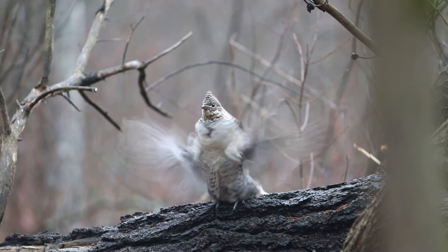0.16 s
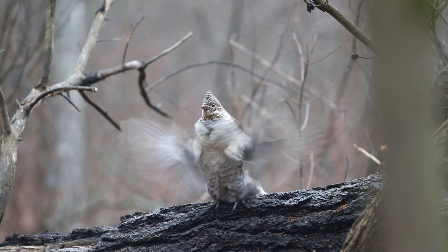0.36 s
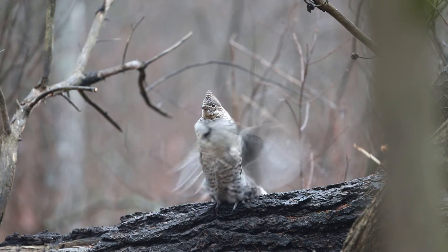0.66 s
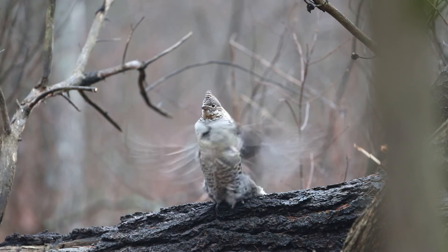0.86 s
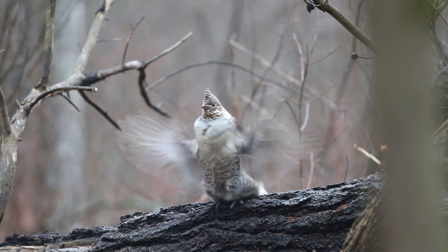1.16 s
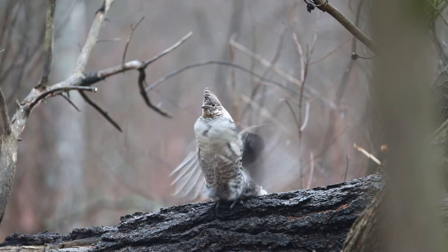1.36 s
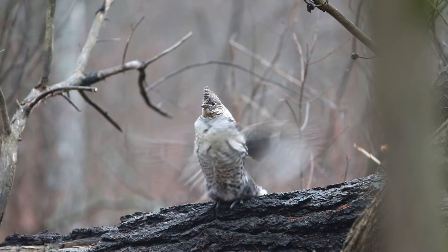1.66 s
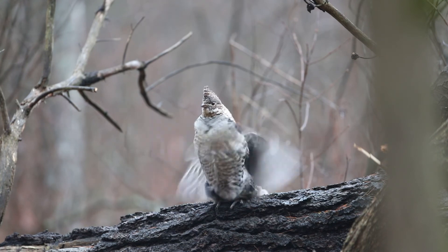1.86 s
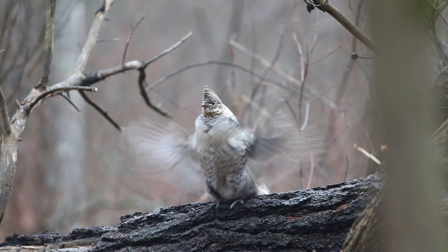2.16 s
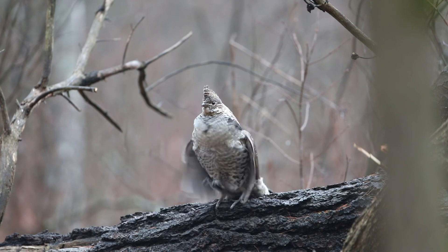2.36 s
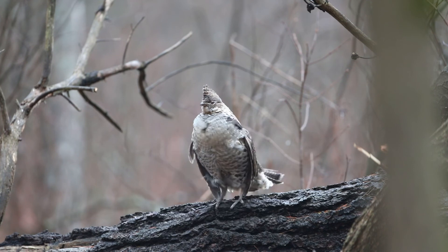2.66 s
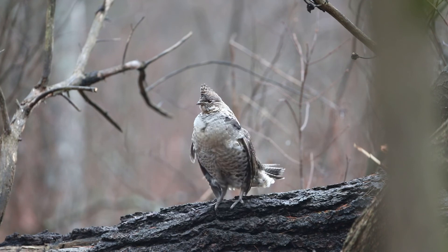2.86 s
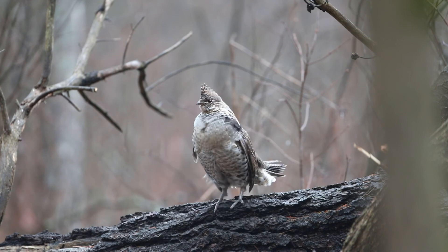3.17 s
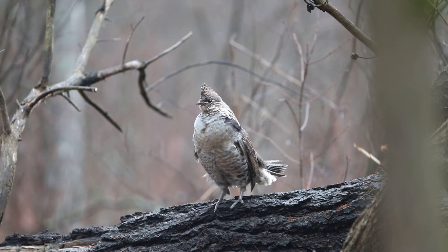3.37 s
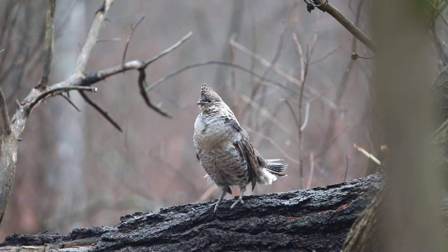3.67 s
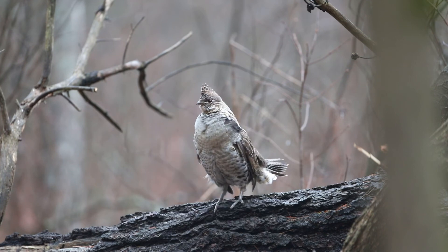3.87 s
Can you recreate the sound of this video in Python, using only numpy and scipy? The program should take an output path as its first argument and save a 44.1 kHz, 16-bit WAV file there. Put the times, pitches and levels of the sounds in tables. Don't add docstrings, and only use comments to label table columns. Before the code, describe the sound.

Wing drumming of a grouse: deep soft thumps speed up, slow down and stop in quiet woods.

```python
import sys
import numpy as np
from scipy import signal
from scipy.fft import rfft, irfft
from scipy.io import wavfile
from scipy.ndimage import uniform_filter1d

SR = 44100
rng = np.random.default_rng(int(sys.argv[2]) if len(sys.argv) > 2 else 0)


def boost(x):
    u = np.asarray(x, float) / 20
    return 10 ** u


def inscribe(sig):
    pcm = np.round(np.clip(np.atleast_2d(sig).T, -1, 1) * 32767)
    wavfile.write(sys.argv[1], SR, pcm.astype(np.int16))


N = 176400
EARLY_S = 0.1
EARLY = SR // 10


def evened(x):
    return x / np.sqrt(np.mean(x ** 2) + 1e-20)


def read(points, hz):
    f, value = np.transpose(points)
    return np.interp(np.log(hz + 1), np.log(f + 1), value)


def add(layer, start_s, sound):
    part = layer[..., round((start_s + EARLY_S) * SR):][..., :sound.shape[-1]]
    part += sound[..., :part.shape[-1]]


def coloured(points, size):
    gain = boost(read(points, np.fft.rfftfreq(size, 1 / SR)))
    return evened(irfft(rfft(rng.standard_normal(size)) * gain, size))


def resonate(x, hz, width_hz):
    b, a = signal.iirpeak(hz, hz / width_hz, SR)
    return signal.lfilter(b, a, signal.lfilter(b, a, x))


def hann(t, lead_s, trail_s):
    return np.cos(np.pi / 2 * np.clip(np.where(t < 0, t / lead_s, t / trail_s), -1, 1)) ** 2


def bell(t, at_s, spread_s):
    return np.exp(-((t - at_s) / spread_s) ** 2 / 2)


def wavelet(t, hz, at_s, half_s, lag_s=0):
    return np.cos(2 * np.pi * hz * (t - at_s)) * hann(t - at_s - lag_s, half_s, half_s)


def tilted(x, left_db):
    return x * boost([[left_db / 2], [-left_db / 2]])


def wash():
    # hz, level_db (per Hz)
    wash_spectrum = [(20, -22), (50, 1.5), (110, -7.5), (250, -10), (1300, -15.5), (4300, -20.5),
                     (9000, -27), (15500, -38)]
    # hz, left-right likeness (0-1)
    ear_likeness = [(30, 1), (120, 0.64), (300, 0.15), (700, 0.28), (2000, 0.04), (9000, 0.042)]
    level_db, left_db, rumble_cut_hz = -54.5, 1.37, 34
    count, hz = N // 256 + 5, np.fft.rfftfreq(1024, 1 / SR)
    re_1, im_1, re_2, im_2, patches = rng.standard_normal((count, 513, 5)).T
    patches = evened(uniform_filter1d(uniform_filter1d(patches, 12, 0), 10, 1))
    flicker, gust = evened(uniform_filter1d(rng.standard_normal((2, count)), 4, 1))
    same = np.clip(read(ear_likeness, hz), -1, 1)[:, None]
    left = re_1 + 1j * im_1
    right = same * left + np.sqrt(1 - same ** 2) * (re_2 + 1j * im_2)
    lumps_db = read([(60, 3.7), (250, 0.22)], hz)[:, None] * gust
    gain = boost(read(wash_spectrum, hz)[:, None] + 0.3 * patches + 0.35 * flicker + lumps_db)
    air = signal.istft(np.array([left, right]) * gain, nperseg=1024, noverlap=768)[1][:, :N]
    high_pass = signal.butter(3, rumble_cut_hz, 'high', fs=SR, output='sos')
    return tilted(boost(level_db) * signal.sosfilt(high_pass, evened(air)), left_db)


def chatter():
    # pitch_hz, width_hz, level_db
    chatter_bands = [(3620, 390, -64.5), (4150, 480, -64.5), (4660, 800, -68), (2250, 110, -72.5)]
    hold_s, fall_db_per_s = 0.07, 65
    out, t = np.zeros((2, N + EARLY)), np.arange(0, .5, 1 / SR)
    fade = boost(-fall_db_per_s * np.maximum(t - hold_s, 0))
    for pitch_hz, width_hz, level_db in chatter_bands:
        for ear, ear_db in zip(out, (3.5, -1.5)):
            throb = boost(3.2 * evened(uniform_filter1d(rng.standard_normal(len(t)), 500)))
            voice = evened(resonate(rng.standard_normal(len(t)), pitch_hz, width_hz))
            add(ear, 0, boost(level_db + ear_db) * fade * throb * voice)
    return out[:, EARLY:]


def thump(t, crisp=1):
    swing = -np.cos(2 * np.pi * 70 * t - 0.115) * hann(t - 0.0012, lead_s=0.0188, trail_s=0.0156)
    shoulder = wavelet(t, hz=119.4, at_s=-0.004, half_s=0.0094)
    return 0.9 * swing + 0.31 * crisp * shoulder


def lift(t, haste):
    return (boost(-25) + 0.36 * haste ** 9) * wavelet(t, hz=89, at_s=-0.0172, half_s=0.01)


def snap(t):
    return boost(-5) * wavelet(t, hz=222, at_s=-0.00475, half_s=0.0096, lag_s=0.0032)


def feather_whistle(t, pitch):
    tone = resonate(rng.standard_normal(len(t)), 1095 * (1 + 0.05 * pitch), width_hz=260)
    return 0.25 * evened(tone * bell(t, at_s=-0.0021, spread_s=0.0066))


def flutter(t):
    # hz, level_db (per Hz)
    flutter_spectrum = [(200, -19), (500, 2), (900, -2.5), (1600, -9), (3000, -14), (6000, -27)]
    return boost(-36) * coloured(flutter_spectrum, len(t)) * bell(t, at_s=-0.0014, spread_s=0.014)


def whirr(t, haste):
    # hz, level_db (per Hz)
    whirr_spectrum = [(60, -4), (150, -13), (300, 2), (600, -2), (1200, 0), (2000, -13), (5000, -26)]
    return boost(-30) * coloured(whirr_spectrum, len(t)) * hann(t, 0.032, 0.032) * haste ** 3


def swish(t):
    # hz, level_db (per Hz)
    swish_spectrum = [(1000, -11), (2500, 0), (4000, 1), (6000, -4.5), (9000, -12), (14000, -27.5)]
    rise_s, fall_s = 0.0053, 0.0093
    since_s = np.maximum(t + 0.015, 0)
    shape = np.minimum(since_s / rise_s, 1) * np.exp(-since_s / fall_s)
    return boost(4.5) * coloured(swish_spectrum, len(t)) * shape


def wood(x):
    # hz, t60_s
    tail_t60 = [(40, 1.6), (150, 1), (1000, 0.65), (6000, 0.19)]
    taps = np.zeros((2, SR))
    at = np.arange(700, SR - 20, 20) + rng.integers(0, 20, (2, (SR - 701) // 20))
    np.put_along_axis(taps, at, rng.choice([-1., 1.], at.shape), 1)
    hz, t, z = signal.stft(taps, SR, nperseg=1024)
    same = np.clip(read([(100, 0.99), (600, 0.25)], hz), 0, 1)[:, None]
    t60_s = read(tail_t60, hz)[:, None]
    z = np.array([z[0], same * z[0] + np.sqrt(1 - same ** 2) * z[1]]) / np.sqrt(t60_s)
    tail = signal.istft(z * boost(-60 * t / t60_s), SR, nperseg=1024)[1]
    return signal.fftconvolve(x[None], tail / np.linalg.norm(tail[0]), axes=1)[:, :len(x)]


def wings():
    # start_s, thump_db, snap_db, swish_db
    wing_beats = [(0.02, -22, -32.5, -55.2), (0.141, -22.5, -34, -55.6), (0.2543, -23, -36.5, -57.5),
                  (0.3594, -24, -36.5, -57), (0.458, -23, -36, -58.5), (0.549, -24, -41, -58.5),
                  (0.6336, -24.5, -47, -59.5), (0.7136, -25.6, -42, -61), (0.7864, -24.5, -43.5, -55.5),
                  (0.8553, -24.5, -40.5, -57), (0.918, -24, -36.5, -57.8), (0.9743, -25, -33.5, -58.5),
                  (1.022, -26.5, -38.5, -57), (1.0704, -25.5, -34.5, -58.4), (1.1296, -26.8, -35.5, -56),
                  (1.1912, -26, -41.5, -56.5), (1.2581, -25, -37, -55), (1.33, -26, -37, -55.4),
                  (1.4067, -26, -38.5, -58), (1.4893, -25.3, -35, -58), (1.5783, -24.5, -38, -59.9),
                  (1.6734, -24, -39, -56), (1.7768, -24.5, -43, -60.5), (1.8852, -23.9, -40.5, -58.5),
                  (2.002, -25, -40.5, -59), (2.1266, -26, -47, -61.5), (2.262, -27.5, -44, -65)]
    # delay_s, level_db, sign
    trunk_echoes = [
        (0.029, -28, -1),
        (.077, -31.5, 1),
    ]
    trunk_squeeze, fastest_gap_s, left_db = 1.54, 0.048, 1.35
    low, high, reed = np.zeros((3, N + EARLY))
    t = np.arange(-.07, .08, 1 / SR)
    times_s = np.transpose(wing_beats)[0]
    hurry = np.minimum(fastest_gap_s / np.diff(times_s, prepend=times_s[0] - .13), 1)
    pitches = rng.standard_normal(len(wing_beats))
    for (s, thump_db, snap_db, swish_db), haste, pitch in zip(wing_beats, hurry, pitches):
        start_s = s + t[0]
        crisp = boost(0.1 * (snap_db - thump_db + 19))
        blow = boost(thump_db) * (thump(t, crisp) + lift(t, haste))
        add(low, start_s, blow + boost(snap_db) * snap(t))
        for delay_s, level_db, sign in trunk_echoes:
            echo = np.sign(sign) * boost(thump_db + level_db) * thump(t * trunk_squeeze)
            add(low, start_s + delay_s, echo)
        add(reed, start_s, boost((swish_db + snap_db) / 2 - 9.5) * feather_whistle(t, pitch))
        add(high, start_s, boost(thump_db) * (flutter(t) + whirr(t, haste)) + boost(swish_db) * swish(t))
    wet = boost(-21.5) * wood(low) + boost(-3.5) * wood(high + boost(-12) * reed)
    return tilted(low + high + reed + wet, left_db)[:, EARLY:]


def whistles():
    # start_s, length_s, from_hz, to_hz, level_db
    near_whistle = (2.549, .128, 4185, 4268, -64.5)
    # start_s, length_s, from_hz, to_hz, level_db
    far_whistles = [(3.01, .04, 4430, 4520, -74), (.135, .03, 3050, 3090, -66), (.5, .065, 2260, 2040, -69),
                    (.595, .06, 2330, 2500, -69), (.69, .08, 2420, 2440, -71), (.7, .04, 2720, 2620, -73),
                    (.77, .025, 3050, 3040, -67), (.78, .05, 2720, 2860, -71), (.09, .02, 6900, 7300, -70),
                    (.098, .012, 8200, 8800, -71), (3.28, .05, 5150, 5150, -74),
                    (3.3, .06, 2760, 2740, -74), (3.17, .02, 4200, 4200, -72),
                    (2.88, .015, 4200, 4150, -71), (.44, .04, 1850, 1950, -71),
                    (1.93, .08, 9200, 9100, -76), (.075, .035, 2230, 2240, -69)]
    fuzz_hz, fuzz_db = 25, 2.5
    out = np.zeros((2, N + EARLY))
    for start_s, length_s, from_hz, to_hz, level_db in [near_whistle] + far_whistles:
        t = np.arange(0, length_s, 1 / SR)
        faint = np.clip((-64 - level_db) / 6, .15, 1)
        drift = uniform_filter1d(rng.standard_normal((2, len(t))), 300, 1)
        waver, wander = faint * evened(drift)
        pitch_hz = from_hz + (to_hz - from_hz) * np.sqrt(t / length_s) + fuzz_hz * wander
        phase = 2 * np.pi * np.cumsum(pitch_hz) / SR
        edge = np.clip(np.minimum(t, length_s - t) / .005, 0, 1)
        shape = edge * boost(-16 * (t / length_s - .42) ** 2)
        ears = np.array([1.3 * np.sin(phase), .8 * np.sin(phase + 0.72)])
        add(out, start_s, shape * boost(level_db + 3.5 + fuzz_db * waver) * ears)
    return out[:, EARLY:]


def puffs():
    # start_s, pitch_hz, level_db
    air_puffs = [
        (2.555, 70, -52),
        (2.757, 98, -52),
        (3.25, 48, -53),
        (3.33, 80, -56),
        (3.43, 75, -56),
        (3.9, 42, -55),
        (3.965, 48, -54),
    ]
    cycles = 2.2
    out, t = np.zeros(N + EARLY), np.arange(-.04, .04, 1 / SR)
    for start_s, pitch_hz, level_db in air_puffs:
        half_s = np.minimum(cycles / pitch_hz, .04)
        add(out, start_s + t[0], boost(level_db) * wavelet(t, pitch_hz, 0, half_s))
    return out[EARLY:]


def scene():
    return wash() + chatter() + wings() + whistles() + puffs()


def top_cut(x):
    return signal.sosfilt(signal.butter(12, 15680, fs=SR, output="sos"), x)


def record(dry):
    return top_cut(dry)


dry = scene()
out = record(dry)
inscribe(out)
```